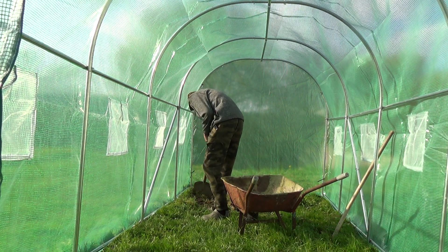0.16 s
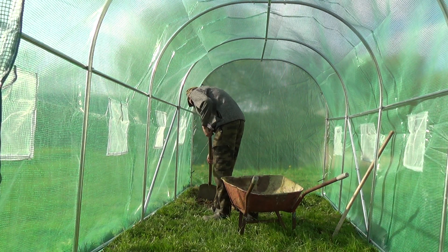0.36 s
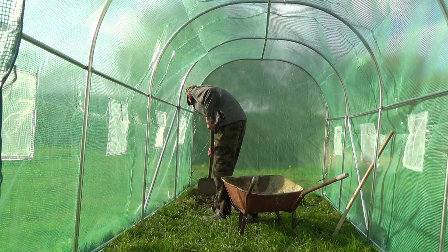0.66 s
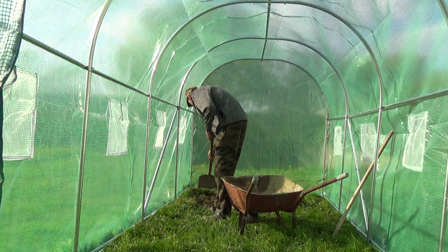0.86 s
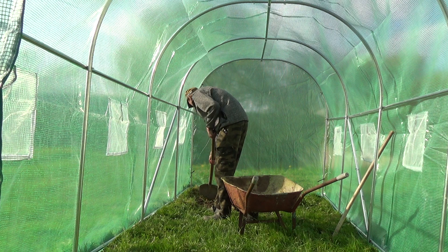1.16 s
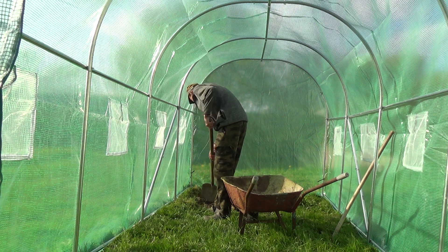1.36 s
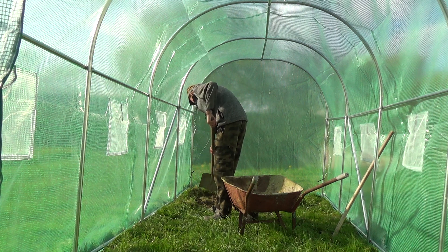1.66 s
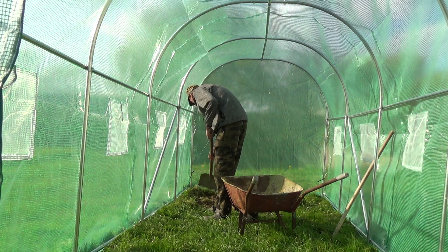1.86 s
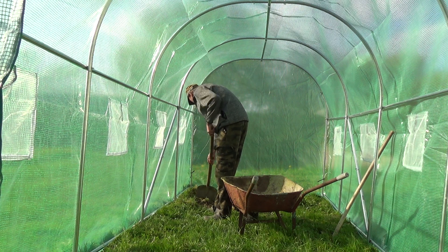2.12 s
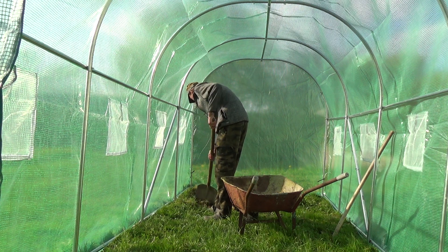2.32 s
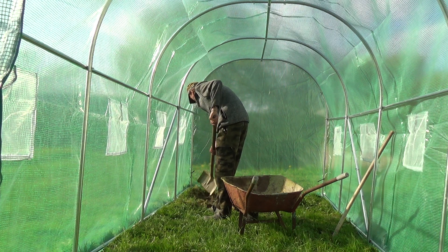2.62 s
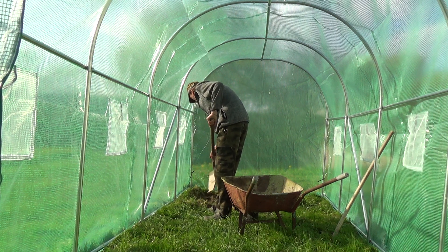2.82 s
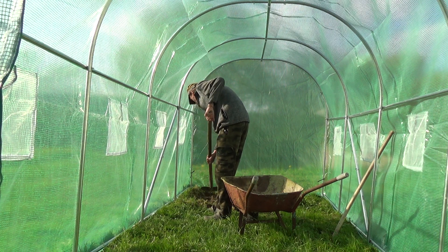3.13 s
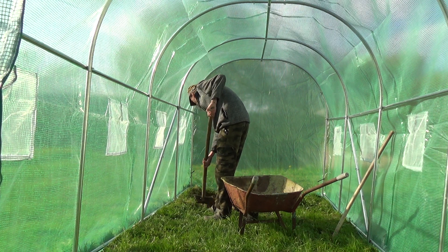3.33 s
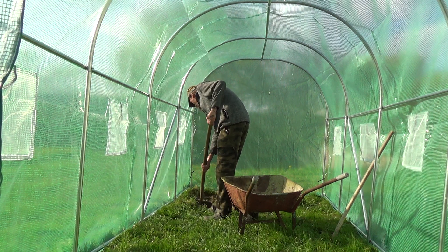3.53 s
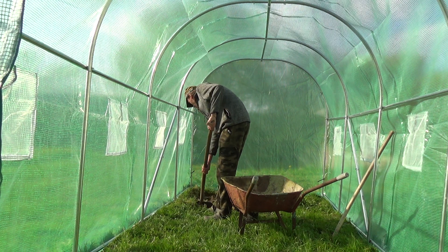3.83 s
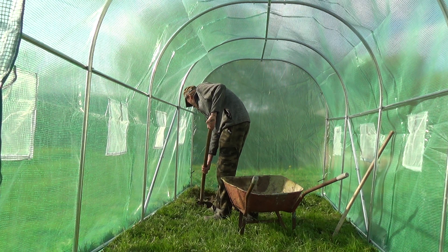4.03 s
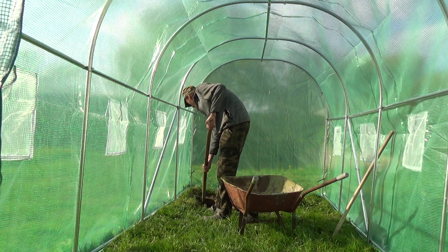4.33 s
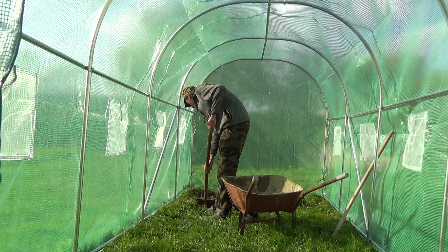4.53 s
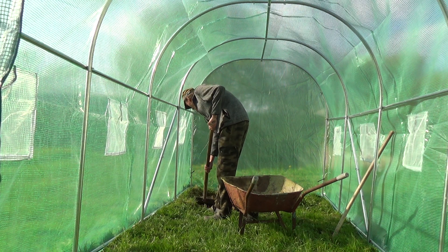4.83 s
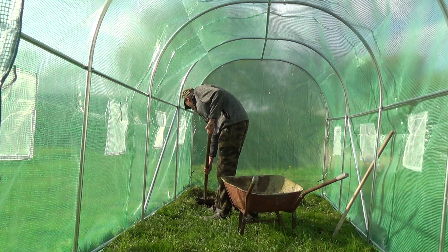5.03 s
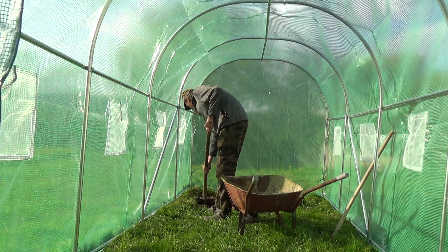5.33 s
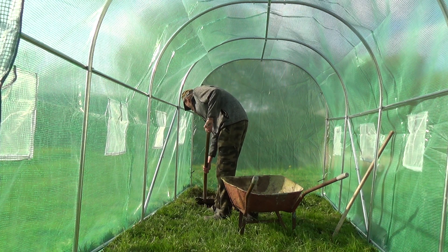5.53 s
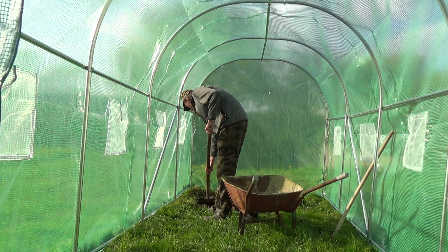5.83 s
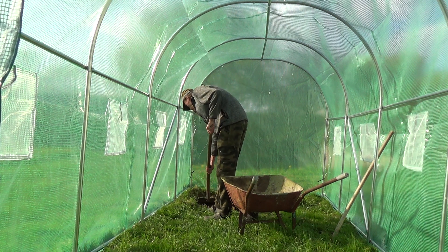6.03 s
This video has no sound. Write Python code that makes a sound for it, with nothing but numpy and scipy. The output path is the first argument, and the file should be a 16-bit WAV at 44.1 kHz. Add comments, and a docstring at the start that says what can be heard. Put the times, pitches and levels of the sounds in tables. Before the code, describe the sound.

A spade bites gritty soil and turf in irregular bursts, stones clinking on ringing steel, over a low engine hum and distant traffic.

```python
"""Spade in a garden tunnel

A spade is worked into turf inside a plastic tunnel: bursts of random clicks make the grit, and narrow
resonances make the steel ring. Stones tap, the blade squeaks, soil thuds, and short echoes surround it all.
A distant engine of unsteady sines draws nearer under far traffic made of coloured noise.
The camera adds a thin whine and turns its gain down when the sound gets too strong.
"""
import sys
import numpy as np
from scipy import signal
from scipy.fft import rfft, irfft
from scipy.io import wavfile

SR = 44100
rng = np.random.default_rng(int(sys.argv[2]) if len(sys.argv) > 2 else 0)


def wav_out(sig):
    """Save sig, one row per channel (or a flat mono array), as 16-bit PCM at SR to the path in sys.argv[1]."""
    wavfile.write(sys.argv[1], SR, np.round(np.clip(np.atleast_2d(sig).T, -1, 1) * 32767).astype(np.int16))


def volts_from_decibels(level):
    """Turn decibel levels (scalar or array-like) into linear amplitude factors."""
    exponent = np.asarray(level, float) / 20
    return 10 ** exponent


N = 272086  # length in samples


def rms_one(x):
    """Scale a sound to an average strength (rms) of 1."""
    return x / np.sqrt(np.mean(x ** 2) + 1e-20)


def in_time(rows):
    """Draw straight lines between the rows of a table whose first column is time."""
    s, *columns = np.transpose(rows)
    t = np.arange(N) / SR
    return [np.interp(t, s, column) for column in columns]


def at_hz(points, hz):
    """Read a table of (pitch, value) at any pitch, evenly per octave between its points."""
    table_hz, values = np.transpose(points)
    return np.interp(np.log(hz), np.log(table_hz), values)


def band(x, low_hz, high_hz, order=2):
    """Keep the sound between two pitches."""
    edges_hz = [low_hz, min(high_hz, .45 * SR)]
    return signal.sosfilt(signal.butter(order, edges_hz, "band", fs=SR, output="sos"), x)


def resonance(x, hz, width_hz):
    """Let the sound ring around one pitch; the gain is 1 at the peak."""
    r = np.exp(-np.pi * width_hz / SR)
    feedback = [1, -2 * r * np.cos(2 * np.pi * hz / SR), r * r]
    return (1 - r * r) / 2 * signal.lfilter([1, 0, -1], feedback, x)


def drift(rate_hz):
    """Wander slowly at random around 0 with a spread of about 1: smoothed noise at every 40th sample."""
    r = np.exp(-80 * np.pi * rate_hz / SR)
    noise = rng.standard_normal(N // 40 + 2002)
    slow = signal.lfilter([1], [1, -2 * r, r * r], noise)[2000:]  # skip the filter's start
    return np.interp(np.arange(N) / 40, np.arange(len(slow)), rms_one(slow))


def shaped(x, spectrum):
    """Colour a sound by a spectrum of (Hz, dB) and scale it to rms 1."""
    hz = np.maximum(np.fft.rfftfreq(x.shape[-1], 1 / SR), 1)
    return rms_one(irfft(rfft(x) * volts_from_decibels(at_hz(spectrum, hz)), x.shape[-1]))


def add(out, s, piece):
    """Mix a short sound into a longer one from the time s in seconds."""
    i = max(round(s * SR), 0)
    out[i:i + len(piece)] += piece


def hush(level_db):
    """Far traffic and air: smooth noise, partly different in the two channels."""
    # colour of the hush: (f/Hz, relative level per Hz/dB)
    hush_colour = [(18, -47), (30, -15.5), (59, -17.5), (73, -7), (92, -15.5), (144, -11.5), (168, -16),
                   (349, -19.5), (378, -18.5), (689, -14), (785, -17.5), (1220, -17.5), (1590, -20.5),
                   (6680, -30.5), (15400, -32)]
    # how alike left and right are: (f/Hz, likeness from 0 to 1)
    likeness = [(60, 1.0), (150, 0.99), (380, 0.81), (950, 0.58), (2380, 0.32), (5980, 0.5), (15000, 0.96)]
    mid, side = rfft(rng.standard_normal((2, N)))
    hz = np.maximum(np.fft.rfftfreq(N, 1 / SR), 1)
    alike = np.clip(at_hz(likeness, hz), 0, 1)
    pair = irfft(np.sqrt(1 + alike) * mid + np.sqrt(1 - alike) * side * [[1], [-1]], N)
    noise = shaped(pair, hush_colour)
    noise = noise / np.std(band(noise, 380, 954))  # the level is set by this band alone
    return noise * volts_from_decibels(level_db + 1.2 * drift(1.3))


def roar(level_db):
    """A hollow band of traffic noise with a wavering level, a little to the left."""
    mid, side = band(rng.standard_normal((2, N)), 480, 800)
    pair = rms_one(mid + 0.4 * side * [[1], [-1]])
    left_over_right_db = 1.5
    balance_db = left_over_right_db * np.array([[.5], [-.5]])
    return pair * volts_from_decibels(level_db + 1.5 * drift(3) + balance_db)


def tones():
    """Thin tones with drifting level and phase, and the whine of the camera electronics, all as sines."""
    # faint tones that swell: (f/Hz, level at start/dB, level at end/dB)
    tone_rows = [(348, -72, -59), (694.4, -70.5, -60), (7812, -76, -65)]
    whine_hz, whine_db = 15625, -59
    t = np.arange(N) / SR
    out = np.zeros(N)
    for hz, start_db, end_db in tone_rows:
        level_db = np.linspace(start_db, end_db, N) + 0.86 * drift(5)
        out += volts_from_decibels(level_db) * np.sin(2 * np.pi * hz * t + 1.8 * drift(1))
    out += volts_from_decibels(whine_db + .8 * drift(2.5)) * np.sin(2 * np.pi * whine_hz * t)
    return np.sqrt(2) * out  # a sine's rms is its peak over root two


def engine(level_db):
    """Low firing orders: sines at multiples of one engine tone, slightly unsteady in phase and level."""
    # strength of each order: (multiple of the engine tone, level re engine/dB)
    orders = [(.5, -14), (1, 1.5), (1.5, -8), (2, -31), (3, -21)]
    engine_hz = 90.7
    turn = 2 * np.pi * engine_hz * np.arange(N) / SR + 0.35 * drift(2.5)
    level_db = level_db + 0.8 * drift(7)  # shared by all orders
    out = np.zeros(N)
    for k, db in orders:
        phase = k * turn + 0.2 * drift(1.6) + rng.uniform(0, 2 * np.pi)
        out += np.sqrt(2) * volts_from_decibels(level_db + db + 0.62 * drift(5)) * np.sin(phase)
    return out


def thuds(rise_s):
    """The soil gives a dull thud: low noise that swells quickly and dies in the loose earth."""
    # thuds: (t/s, level/dB, centre f/Hz)
    thud_rows = [(0.13, -38, 470), (0.243, -35.5, 165), (0.416, -39.5, 536), (0.462, -36, 275),
                 (0.479, -38.5, 538), (1.115, -34.5, 176), (1.245, -38.5, 480), (1.399, -45, 468),
                 (1.84, -41.5, 299), (2.053, -39.5, 187), (2.17, -34, 480), (2.199, -37, 438),
                 (2.329, -44, 188), (3.009, -44, 215), (3.659, -39, 400), (4.702, -38.5, 332.5),
                 (4.731, -43, 535), (5.397, -43, 649)]
    t60_s = 0.13  # time to fall by 60 dB
    out, t = np.zeros(N + SR), np.arange(SR // 4) / SR
    shape = (1 - np.exp(-t / rise_s)) * volts_from_decibels(-60 * t / t60_s)
    shape = shape / shape.max()
    for s, db, hz in thud_rows:
        noise = rms_one(band(rng.standard_normal(len(t)), hz / 2.23, hz * 1.95))
        add(out, s, volts_from_decibels(db) * shape * noise)
    return out[:N]


def squeaks():
    """The blade sings as it rubs: gliding narrow notes, the low ones cleaner and the higher ones rougher."""
    # squeaks: (start t/s, end t/s, start f/Hz, end f/Hz, peak level before wavering/dB)
    squeak_rows = [(.07, 0.142, 2950, 2950, -41), (0.133, 0.279, 1497, 1420, -42.5),
                   (0.882, 0.994, 1450, 1390, -43), (0.997, 1.034, 1507, 1110, -37.5),
                   (1.018, 1.095, 1073, 1070, -40.5), (1.016, 1.066, 3030, 3030, -42),
                   (1.108, 1.149, 1250, 1210, -34.5), (1.20, 1.283, 1520, 1477, -47),
                   (5.368, 5.401, 9210, 9200, -36)]
    clean_below_hz, clean_radians, rough_radians = 1300, 0.6, 1.25  # size of the phase waver
    waver_db = 3.0
    out = np.zeros(N + SR)
    for start, end, start_hz, end_hz, db in squeak_rows:
        size = round((end - start) * SR)
        rough = clean_radians if end_hz < clean_below_hz else rough_radians
        waver = rms_one(signal.lfilter([1], [1, -.985], rng.standard_normal((2, size))))
        glide_hz = np.linspace(start_hz, end_hz, size)
        turn = 2 * np.pi * np.cumsum(glide_hz) / SR + rough * waver[0]
        fade = signal.windows.tukey(size, .4)  # soft start and end
        add(out, start, volts_from_decibels(db + waver_db * waver[1]) * fade * np.sin(turn))
    return out[:N]


def taps():
    """Small stones tap the steel: a noise crack with a short bright ring, and a hollow knock as a sine."""
    # taps: (t/s, crack peak level/dB, ring f/Hz, knock re crack peak/dB)
    tap_rows = [(0.3914, -10.5, 10400, -25), (0.4784, -15, 10000, -14), (0.5544, -24, 10000, -20),
                (1.1199, -6.5, 9000, -28), (1.1253, -5, 10000, -30), (1.1749, -12, 9700, -25),
                (1.2074, -10.5, 8300, -28), (1.8425, -21, 11200, -9), (2.0593, -12, 7800, -25),
                (2.2004, -4, 11700, -22), (4.5248, -30, 10310, -14), (4.568, -22, 7800, -15),
                (4.7033, -19, 8200, -13), (4.7335, -13.5, 8400, -4), (4.8801, -29, 5230, -22),
                (5.2929, -16, 8600, -25), (5.5622, -33, 10200, -16), (5.9324, -33, 7810, -12)]
    contact_t60_s, knock_t60_s, knock_hz = 0.016, 0.014, 880
    out, t = np.zeros(N + SR), np.arange(SR // 10) / SR
    knock = volts_from_decibels(-60 * t / knock_t60_s) * np.sin(2 * np.pi * knock_hz * t)
    for s, db, ring_hz, knock_db in tap_rows:
        contact = rng.standard_normal(len(t)) * volts_from_decibels(-60 * t / contact_t60_s)
        crack = band(contact, 2800, 11700, order=1) + 5.0 * resonance(contact, ring_hz, 600)
        add(out, s, volts_from_decibels(db) * (crack / np.abs(crack).max() + volts_from_decibels(knock_db) * knock))
    return out[:N]


def grains(size, per_s, spread_db):
    """Dense random clicks of grit, a few much bigger than the rest; rms 1."""
    draw = rng.random((size, 3))
    big = volts_from_decibels(spread_db * np.minimum(-np.log(draw[:, 0] + 1e-9), 4))
    sign = np.sign(draw[:, 1] - .5)
    present = draw[:, 2] < per_s / SR
    return rms_one(big * sign * present)


def strokes():
    """Gain of grit and of blade body: each stroke rises, holds and falls away; the strongest one counts."""
    # strokes: (start of hold t/s, hold/s, grit level before the blade rings/dB, blade body re grit/dB)
    stroke_rows = [(0.16, 0.27, -35.5, -6), (0.7, 0.2, -52, -5), (1.09, 0.14, -35, -10),
                   (1.3, .12, -44, -5), (1.85, 0.18, -46, -9), (2.22, 0.12, -41, -7), (2.88, 0.64, -49, -3),
                   (3.56, 0.95, -50, -5), (4.78, 0.1, -41, -12), (5.2, 0.1, -51, -1)]
    rise_db_per_s, fall_db_per_s = 120, 60
    grit_rest_db, body_rest_db = -63, -57
    t = np.arange(N) / SR
    out = volts_from_decibels([[grit_rest_db], [body_rest_db]]) * np.ones((2, N))
    for s, hold, db, body_db in stroke_rows:
        before_s, after_s = np.maximum(s - t, 0), np.maximum(t - s - hold, 0)
        fade_db = rise_db_per_s * before_s + fall_db_per_s * after_s
        out = np.maximum(out, volts_from_decibels(db - fade_db + np.array([[0], [body_db]])))
    return out


def slide(patchy_db):
    """Loose soil hisses along the blade in uneven clumps: clicks whose pitch regions drift one by one."""
    # colour of the sliding grit: (f/Hz, relative level per Hz/dB)
    grit_colour = [(1470, -19), (2500, -11), (3060, -1.5), (3360, -4), (5640, -3), (6140, -2), (8870, 0),
                   (12000, 1), (15600, -28), (22000, -120)]
    hiss = shaped(grains(N, 16000, 2.5), grit_colour)
    edges_hz = np.geomspace(1500, 16500, 13)
    grit = np.zeros(N)
    for low_hz, high_hz in zip(edges_hz, edges_hz[1:]):
        grit += band(hiss, low_hz, high_hz) * volts_from_decibels(patchy_db * drift(10.4))
    grit = rms_one(grit) * volts_from_decibels(1.7 * drift(27))
    body = rms_one(band(grains(N, 9000, 2.3), 1200, 3500)) * volts_from_decibels(2.2 * drift(28))
    # low grind of earth, 18 dB below the sliding grit
    rumble = rms_one(band(grains(N, 3000, 2.3), 180, 650)) * volts_from_decibels(-18 + 2.2 * drift(12))
    pressure, body_gain = strokes()
    return pressure * (grit + rumble) + body_gain * body


def crunch(shape, hz, body_db, octaves):
    """A burst of clumped grit around its own pitch, with a lower blade note."""
    clump_db = 2.3  # random level change every 64 samples
    clumps = np.repeat(volts_from_decibels(clump_db * rng.standard_normal(len(shape) // 64 + 1)), 64)[:len(shape)]
    burst = grains(len(shape), 12000, 2.84) * clumps
    grit = rms_one(band(burst, hz * 2 ** -octaves, hz * 2 ** octaves, order=1))
    grit = grit + 0.47 * rms_one(resonance(burst, hz, 2250))
    body = volts_from_decibels(body_db) * rms_one(band(burst, 1660, 3900) + resonance(burst, 1500, 240))
    return shape / shape.max() * (grit + body)


def rustles():
    """Tearing roots and loose soil: grit that rises and falls softly, with wider swells when quieter."""
    # swells: (centre t/s, level before the blade rings/dB, grit centre f/Hz)
    rustle_rows = [(0.1339, -35, 9200), (0.2157, -38, 5940), (0.2603, -31, 9200), (0.2894, -35.5, 9900),
                   (0.3949, -22.5, 9300), (0.4188, -28, 7830), (0.4819, -28, 5570), (0.6537, -45.5, 8100),
                   (0.8, -47.5, 10800), (0.9736, -42, 11400), (1.0442, -34.5, 8700), (1.1348, -29.5, 10000),
                   (1.2074, -25, 8900), (1.2406, -35, 8700), (1.268, -30, 8730), (1.3048, -38, 7830),
                   (1.9805, -41.5, 9500), (2.184, -21, 11700), (2.3502, -43, 8500), (2.634, -45, 11260),
                   (3.0488, -40, 10800), (3.4688, -44, 9260), (3.5902, -29, 10000), (3.669, -36, 9500),
                   (4.1488, -48, 10900), (4.4407, -32, 5490), (4.6394, -42, 7900), (4.6692, -42, 8160),
                   (4.849, -42, 10060), (4.9191, -39.5, 8980), (5.1244, -47.5, 4290),
                   (5.3841, -31.5, 10810), (5.8041, -44, 8960)]
    firm_spread_s, wider_s_per_db, firm_db = 0.0135, 0.0009, -31
    out, t = np.zeros(N + SR), np.arange(-SR // 10, SR // 10) / SR
    for s, db, hz in rustle_rows:
        spread_s = firm_spread_s + wider_s_per_db * max(firm_db - db, 0)
        swell = np.exp(-.5 * (t / spread_s) ** 2)
        add(out, s + t[0], volts_from_decibels(db) * crunch(swell, hz, body_db=-18, octaves=1.0))
    return out[:N]


def bites(rise_s):
    """The blade bites into turf: grit starts suddenly, then dies away."""
    # bites: (t/s, level before the blade rings/dB, grit centre f/Hz, blade body re level/dB, 60 dB fall/s)
    bite_rows = [(0.0916, -38.5, 5070, -26, .09), (0.371, -21, 10500, -29, .18),
                 (0.4616, -30, 5500, -3, .17), (0.5543, -33, 10000, -30, .16),
                 (1.0823, -25.5, 7340, -30, .18), (1.1023, -19, 7700, -30, .22),
                 (1.1199, -13, 10000, -22, .13), (1.1732, -30, 9660, -22, .14),
                 (1.8427, -39, 11300, -9, .25), (2.0504, -13, 9900, -12.5, .14),
                 (2.0592, -8, 7800, -15, .12), (2.2009, -16, 10500, -8, .11), (3.5603, -30, 10700, -12, .2),
                 (4.7026, -25.5, 8360, -14, .07), (5.2918, -34, 9800, -30, .11),
                 (5.368, -27.5, 8780, -30, .17), (5.397, -33, 4000, -2, .06)]
    out, t = np.zeros(N + SR), np.arange(SR // 4) / SR
    for s, db, hz, body_db, t60 in bite_rows:
        shape = (1 - np.exp(-t / rise_s)) * volts_from_decibels(-60 * t / t60)
        add(out, s, volts_from_decibels(db) * crunch(shape, hz, body_db, octaves=1.0))
    return out[:N]


def blade(x, ring_db):
    """The grit is heard directly and through the narrow resonances of the steel."""
    # what the blade rings with: (f/Hz, width/Hz, level before ring_db is added/dB)
    resonances = [(1520, 32, -1.5), (2150, 64, 6), (2590, 71, -9), (4510, 89, 6), (5530, 280, -13),
                  (7190, 46, 3.5), (8460, 55, -6), (8350, 90, -19), (8940, 18, -9), (9350, 80, -16),
                  (9950, 200, -8), (10000, 75, -19), (11000, 120, -15.5), (11700, 140, -23)]
    out = x
    for k, (hz, width_hz, db) in enumerate(resonances):
        out = out + (-1) ** k * volts_from_decibels(ring_db + db) * resonance(x, hz, width_hz)  # signs alternate
    return out


def dulled(steel):
    """Sliding soil has little treble: weaken everything above one pitch."""
    dull_hz, dull_db = 11400, -31.5
    low = signal.sosfilt(signal.butter(4, dull_hz, fs=SR, output="sos"), steel)
    high = signal.sosfilt(signal.butter(4, dull_hz, "high", fs=SR, output="sos"), steel)
    return low + volts_from_decibels(dull_db) * high


def tunnel(x):
    """Short smeared echoes off sheeting and ground: fading noise, different for each side."""
    t60_s, echo_db = 0.068, -14.5
    t = np.arange(SR // 4) / SR
    echo = rng.standard_normal((2, len(t))) * volts_from_decibels(-60 * t / t60_s) * (t > .003)
    echo = band(echo, 140, 12500)  # thin sheeting lets the bass through
    echo /= np.sqrt(np.sum(echo ** 2, axis=1, keepdims=True))
    return x + volts_from_decibels(echo_db) * signal.fftconvolve(x[None], echo, axes=1)[:, :N]


def scene():
    """Spade in the tunnel, engine and traffic outside, and the thin tones."""
    # the engine draws nearer, a roar of traffic swells and passes: (t/s, engine level/dB, roar level/dB)
    approach = [(0, -52, -66), (1.3, -49.5, -60), (2.4, -50.5, -55), (3.7, -49.5, -52), (4.55, -47.5, -53),
                (6.17, -46.5, -60)]
    engine_db, roar_db = in_time(approach)
    background = hush(-50.7) + roar(roar_db) + tones() + engine(engine_db)
    grit = slide(patchy_db=0.7) + rustles() + bites(rise_s=0.00095)
    steel = dulled(blade(grit, ring_db=2.5))
    spade = steel + taps() + squeaks() + thuds(rise_s=0.0021)
    return background + tunnel(spade)


def gain_control(x):
    """The camera drops its gain by as much as the level passes the hold level, then creeps back."""
    hold_db, sense_s, recover_db_per_s = -14.5, 0.012, 2.5
    r = np.exp(-1 / (sense_s * SR))
    ramp_db = recover_db_per_s * np.arange(N) / SR
    power = signal.lfilter([1 - r], [1, -r], np.mean(x ** 2, axis=0))
    excess_db = np.maximum(10 * np.log10(power + 1e-12) - hold_db, 0)
    # the ramp lets each past excess shrink steadily while the largest one still counts
    over_db = np.maximum.accumulate(excess_db + ramp_db) - ramp_db
    return x * volts_from_decibels(-over_db)


def top_cut(x):
    """Nothing passes above the cut-off."""
    return signal.sosfilt(signal.butter(12, 16850, fs=SR, output="sos"), x)


def record(dry):
    """After the gain control the deepest bass is cut, peaks are rounded and the top is cut."""
    steady = gain_control(dry)
    no_bass = signal.sosfilt(signal.butter(4, 36, "high", fs=SR, output="sos"), steady)
    rounded = np.tanh(no_bass)
    mix = signal.sosfilt(signal.ellip(12, .5, 70, 15760, fs=SR, output="sos"), rounded)
    return top_cut(mix)


dry = scene()
out = record(dry)
wav_out(out)
```